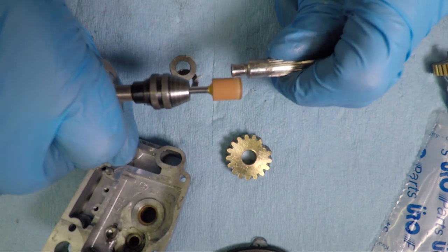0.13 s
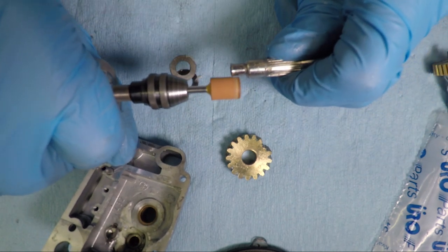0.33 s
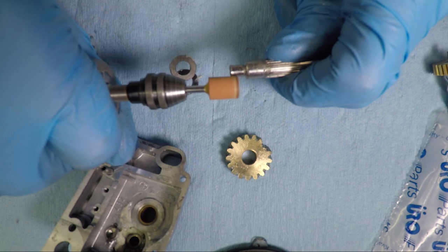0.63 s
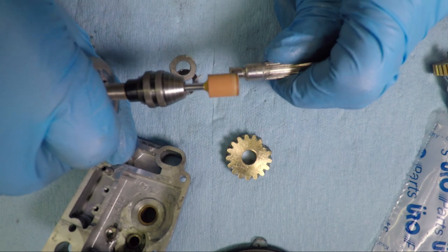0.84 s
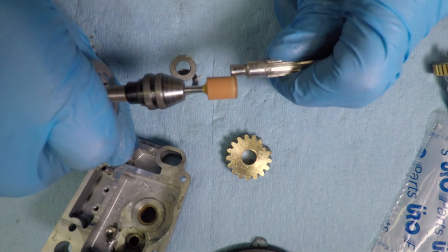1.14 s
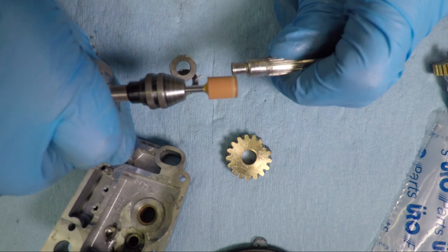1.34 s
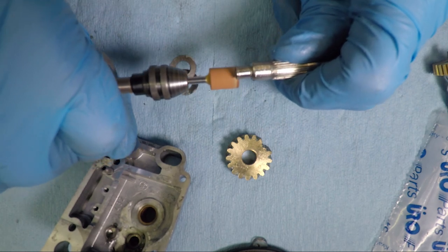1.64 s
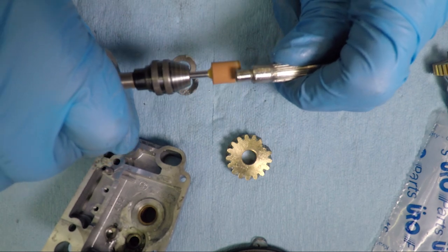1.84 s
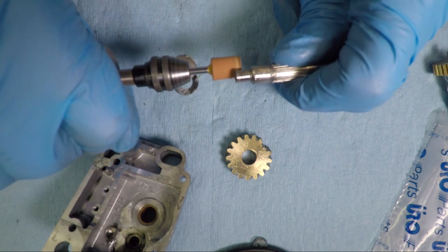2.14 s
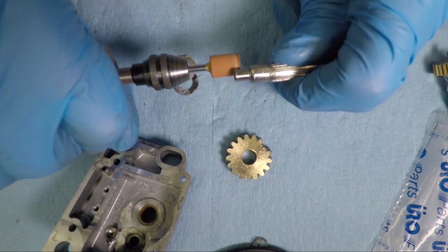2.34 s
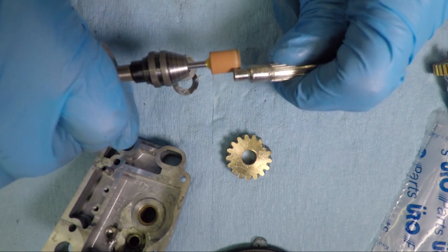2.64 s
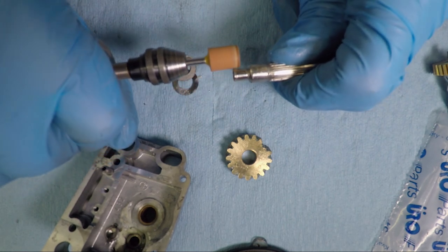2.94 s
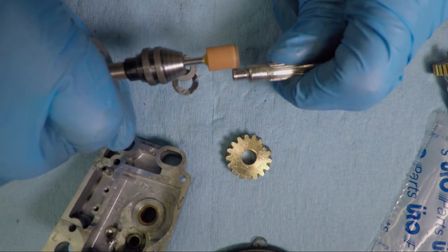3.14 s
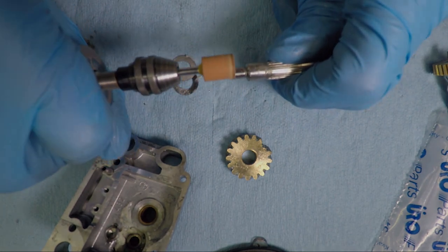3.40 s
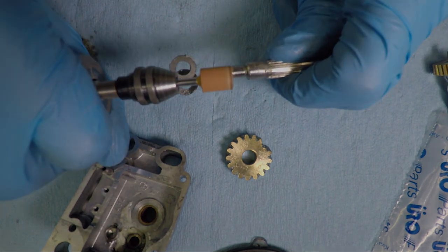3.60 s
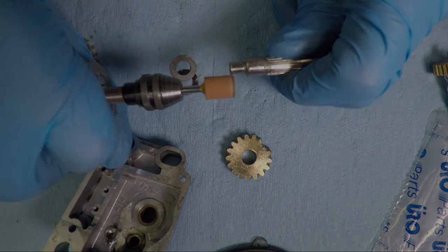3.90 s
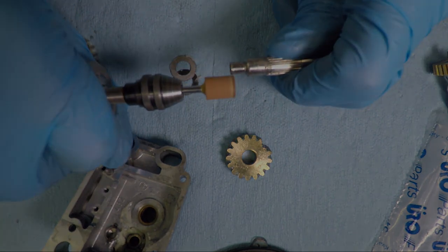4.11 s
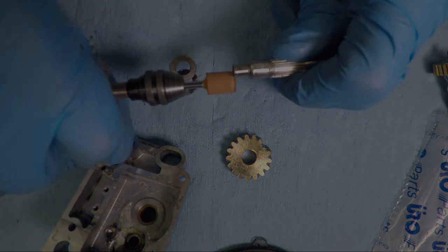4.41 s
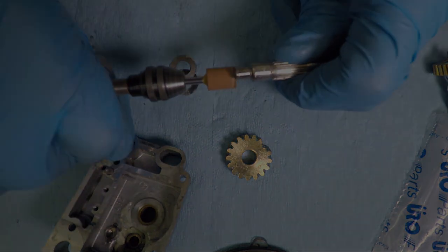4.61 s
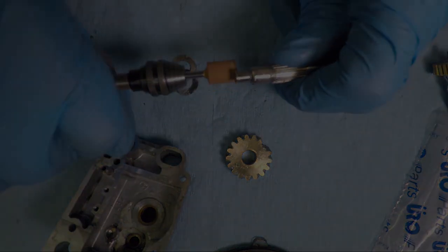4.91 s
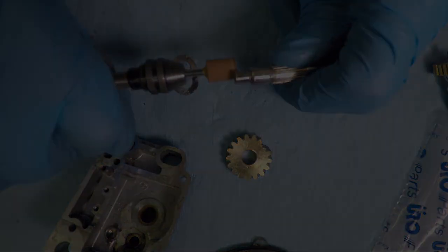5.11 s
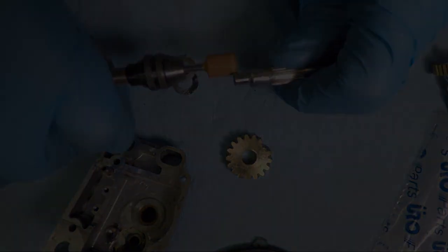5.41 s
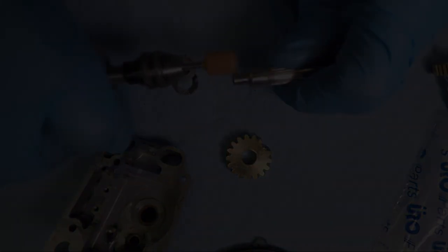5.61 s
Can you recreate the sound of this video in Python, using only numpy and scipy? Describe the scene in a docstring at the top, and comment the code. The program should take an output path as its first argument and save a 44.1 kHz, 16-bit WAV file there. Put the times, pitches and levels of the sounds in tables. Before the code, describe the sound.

A small rotary tool whines as its sanding drum grinds a steel shaft, with a buzzing, ringing rasp that gradually fades.

```python
"""In a workshop, a rotary tool spins a small sanding drum against a hand-held steel shaft.
The drum turns about 208 times a second. Its high spot knocks the steel once a turn, so the steel
rings and buzzes, while the grit rasps and crackles with the same beat. The motor whines and slows
a little under load, mains hum lies below, and the sound fades out at the end."""
import sys
import numpy as np
from scipy import signal
from scipy.fft import rfft, irfft, next_fast_len
from scipy.io import wavfile
from scipy.ndimage import uniform_filter1d

SR = 44100
rng = np.random.default_rng(int(sys.argv[2]) if len(sys.argv) > 2 else 0)


def digitize_waveform(pressure):
    """Quantize a signal to 16-bit integers and store it at the path in sys.argv[1].

    Rows of a 2-D input are taken as channels; values are limited to [-1, 1].
    """
    field = np.atleast_2d(pressure).T
    bounded = np.clip(field, -1, 1)
    quanta = np.round(bounded * 32767).astype(np.int16)
    wavfile.write(sys.argv[1], SR, quanta)


N = 253575
TIME = np.arange(N) / SR
FIRM_DB = -26.5  # grinding level of a firm stroke


def grinding(turns, press_db, bright_db, edge, buzz_db, bounce, wobble_hz=44.5, bounce_turns=3):
    """Ring, buzz, rasp and grit get louder as the hand presses; the drum may bounce and chatter."""
    # the hand-held shaft wobbles, so the knock comes early or late
    contact = turns + .0035 * drift(12) + .0018 * tone(wobble_hz * TIME + .3 * drift(8))
    bright_db = bright_db + 2.3 * (press_db - FIRM_DB)  # pressing harder brightens the ring
    middle_db = np.interp(edge, [0, 1], [-6, 2.5])
    ring = from_db(-5) * ringing_steel(contact, bright_db, middle_db)
    drag = from_db(-8.5) * rasp(contact)
    chips = from_db(np.interp(edge, [0, 1], [-9, -14])) * grit(turns, press_db)
    note = singing(turns, edge)
    chatter = 1 + bounce * np.cos(2 * np.pi * (turns / bounce_turns + .25 * drift(10)))
    steel = ring + from_db(buzz_db + 5.5) * buzz(contact) + drag + chips
    flutter = from_db(drift(25))
    return from_db(press_db) * (flutter * chatter * steel + note) + catches(contact) + snaps(press_db)


# The notes at which the shaft and the drum's stem ring. A narrow note rings longer.
# pitch_hz, width_hz, relative_db
STEEL_NOTES = [(1057, 144, -7.5), (1186, 89, -8), (1307, 214, -10), (1494, 350, -6), (1658, 200, -5.5),
               (1839, 180, -4.5), (2073, 490, -2.5), (2420, 540, -4), (2564, 250, -5), (2746, 60, 2.5),
               (3140, 530, -3), (3327, 440, -0.5), (3510, 310, -1), (3694, 370, -5), (4310, 370, -7.5),
               (5335, 240, -9)]

def ringing_steel(turns, bright_db, middle_db, middle_hz=2640, pivot_hz=3470):
    """Knocks and scraping ring the steel; the mix of notes shifts as the touching point moves."""
    hits = knocks(turns, scatter_turns=.0012, uneven_db=1.6)
    scrape = rms_one(once_a_turn(turns, sharpness=1.8) * rng.standard_normal(N))
    drive = hits + .18 * scrape
    ring = np.zeros(N)
    for k, (hz, width, db) in enumerate(STEEL_NOTES):
        tilt_db = .51 * bright_db * np.clip(np.log2(hz / pivot_hz), -.7, .65)
        bump_db = middle_db * np.exp(-(np.log2(hz / middle_hz) / .67) ** 2)
        gain = from_db(db + tilt_db + bump_db + 3.5 * swell(12))
        ring += (-1) ** k * gain * resonate(drive, hz, width)
    return ring / np.sqrt(uniform_filter1d(ring ** 2, size=2200) + 1e-12)  # keep the level even


# The tones of the buzz that the shaft lets through: cycles_per_turn, relative_db
BUZZ_TONES = [(15, 3), (16, 1), (17, -5), (18, -2), (19, -10), (20, 5), (21, 4), (22, 0), (23, -9), (24, 1),
              (25, 0), (26, 6), (27, 5)]
# The pitch the touching point favours as the tip slides along the drum: time_s, pitch_hz
CONTACT_PITCH = [(0.3, 4250), (0.75, 4480), (1.05, 4650), (1.35, 4380), (2.0, 4420), (2.8, 4370),
                 (3.1, 4500), (3.2, 4620), (3.3, 4880), (3.5, 4880), (4.0, 4350), (4.35, 4800),
                 (4.52, 4650), (5.35, 4330), (5.75, 4350)]

def buzz(turns, width_hz=1000, flicker_db=2.2):
    """The knocks make the touching point buzz; tones near its sliding pitch are boosted."""
    centre_hz, = in_time(CONTACT_PITCH)
    turns_per_s = np.gradient(turns) * SR
    wave, power = 0, 0
    for multiple, db in BUZZ_TONES:
        off_centre = (multiple * turns_per_s - centre_hz) / width_hz
        response = from_db(db + flicker_db * swell(12)) / (1 + 2j * off_centre) ** 2
        wave += response * np.exp(2j * np.pi * multiple * (turns + .78))
        power += abs(response) ** 2
    return wave.real * np.sqrt(2 / power)


# How strong the rasp is from low to high: pitch_hz, relative_db
RASP_COLOUR = [(200, -90), (400, -6.5), (700, -5.5), (1100, -4), (2000, 0), (3000, -2), (3700, -1.5),
               (4500, 4.5), (5200, -5.5), (5900, -18), (8000, -16), (16000, -40)]

def rasp(turns):
    """The rough drum drags over the steel all the way round, hardest near the high spot."""
    grip = 1 + once_a_turn(turns - .1, sharpness=.5)
    return rms_one(colour(grip * rng.standard_normal(N), RASP_COLOUR))


# How strong the crackle is from low to high: pitch_hz, relative_db
GRIT_COLOUR = [(1500, -23.5), (4000, 2.5), (6000, -2), (7600, 1), (8500, -5.5), (9700, 2), (11600, 1.5),
               (12600, -2.5), (14000, -2.5), (15500, -8.5)]

def grit(turns, press_db, grains_per_s=18000, full_bite_db=-17.5):
    """Grains tear off tiny chips; pressure bunches them into one burst a turn, ahead of the knock."""
    grains = (rng.random(N) < grains_per_s / SR) * rng.choice([-1, 1], N)
    sizes = from_db(-2 * np.minimum(rng.exponential(1, N), 5))
    firmness = from_db(.85 * np.minimum(press_db - full_bite_db, 0))
    ahead = turns + .4
    bite = .26 + firmness * once_a_turn(ahead, sharpness=2)
    chips = rms_one(grains * sizes) * bite / np.sqrt(uniform_filter1d(bite ** 2, size=850))
    # a few tall grains strike at the same places every turn and make the treble buzz
    ticks = sum(from_db(2.5 * drift(5)) * knocks(ahead + place, scatter_turns=.0006, uneven_db=2.2)
                for place in rng.normal(0, .09, size=8))
    return rms_one(colour(chips + 1.1 * firmness * rms_one(ticks), GRIT_COLOUR))


def singing(turns, edge, cycles_per_turn=13):
    """One high, wavering note, louder when the tip rides the drum's edge."""
    level_db = np.interp(edge, [0, 1], [-25, -5]) + .7 * swell(30) + .7 * swell(7)
    return from_db(level_db) * tone(cycles_per_turn * turns + .05 * drift(25))


# Moments when the drum catches on the steel; each has died away after 2.7 times its length.
# start_s, length_s, pitch_hz, width_hz, level_db
DRUM_CATCHES = [(0.095, 0.025, 2000, 394, -27), (0.177, 0.02, 2040, 300, -30.5),
                (0.278, 0.018, 1940, 754, -23.5), (0.71, 0.022, 2870, 1500, -36),
                (0.716, 0.026, 2720, 110, -27.5), (2.874, 0.021, 4450, 400, -29),
                (3.148, 0.078, 1190, 130, -37), (3.48, 0.016, 1900, 1900, -24),
                (4.443, 0.06, 1156, 69.4, -29.5), (4.292, 0.15, 5200, 700, -32.5),
                (4.34, 0.1, 2170, 700, -31), (4.452, 0.04, 4630, 200, -31), (4.68, 0.057, 2180, 200, -35),
                (4.79, 0.086, 2330, 700, -30), (5.455, 0.016, 4070, 1500, -26.5)]

def catches(turns):
    """A catch starts at once, hammers one note of the steel and lets go."""
    drive = knocks(turns, scatter_turns=.002, uneven_db=4) + 1.1 * rng.standard_normal(N)
    out = np.zeros(N)
    for start, length, hz, width, db in DRUM_CATCHES:
        corners_s = [start, start + .0019, start + .67 * length, start + 2.7 * length]
        envelope = np.interp(TIME, corners_s, [0, .8, .86, 0])
        ring = resonate(resonate(drive, hz, width), hz, width)
        ring_level = np.sqrt(np.average(ring ** 2, weights=envelope + 1e-9))
        out += from_db(db) * envelope * ring / ring_level
    return out


# Moments when a single grain snaps off the drum: start_s, peak_db
GRAIN_SNAPS = [(0.199, -32), (0.682, -19), (1.004, -9), (1.164, -12), (2.186, -20), (2.206, -17),
               (2.218, -24), (2.381, -17), (2.414, -17), (2.421, -17), (3.279, -8), (3.65, -17.5),
               (3.72, -26)]

def snaps(press_db, per_s=45, ring_hz=3600, width_hz=2600):
    """A snapping grain gives one sharp click; small ones come at random and grow with the pressure."""
    clicks = (rng.random(N) < per_s / SR) * from_db(press_db + 8 - 3 * rng.uniform(-1, 1, N))
    for start, db in GRAIN_SNAPS:
        clicks[round(start * SR)] += from_db(db)
    height = 1 - np.exp(-np.pi * width_hz / SR)  # ringing flattens a click; dividing restores its peak
    return resonate(clicks * rng.choice([-1, 1], N), ring_hz, width_hz) / height


# When the steel is held to the drum: touch_s, lift_s
TOUCH_TIMES = [(0.075, 0.135), (0.174, 0.212), (0.272, 1.522), (1.637, 3.512), (3.635, 3.72), (3.883, 4.92),
               (5.025, 5.8)]
# How hard the hand presses, given as the level of the grinding: time_s, level_db
HAND_PRESSURE = [(0.075, -27), (0.12, -28.5), (0.28, -23.5), (0.36, -25.5), (0.6, -24), (0.73, -21.5),
                 (0.78, -24.5), (0.87, -24), (0.92, -27), (0.99, -24), (1.2, -26), (1.27, -27), (1.37, -23),
                 (1.52, -27.5), (1.7, -33), (1.78, -29.5), (1.95, -29.5), (2.2, -26.5), (2.35, -32.5),
                 (2.43, -27), (2.75, -23.5), (2.94, -26), (3.13, -24), (3.29, -26), (3.39, -27.5),
                 (3.5, -24), (3.63, -38), (3.75, -37), (3.92, -29), (4.07, -27), (4.22, -28), (4.3, -25),
                 (4.49, -23), (4.57, -27.5), (4.72, -27.5), (4.87, -26), (5.05, -27.5), (5.17, -28.5),
                 (5.26, -31.5), (5.47, -25.5), (5.75, -24)]
# How the steel meets the drum. Edge is 0 on the drum's face and 1 on its edge.
# The last two columns set how much the tool shakes twice and three times a turn.
# time_s, bright_db, edge_0_to_1, buzz_db, bounce_0_to_1, shake_twice_db, shake_thrice_db
HAND_STYLE = [(0.12, -1, 0, -15.5, 0, -47.5, -52), (0.25, -11, 0.5, -15.5, 0.1, -48, -55),
              (0.34, -6, 0.57, -14, 0.2, -59, -46.5), (0.85, -14, 0.64, -12, 0, -64, -40),
              (0.92, 6, 0.7, -15, 0.1, -50, -57), (0.98, -6, 0.6, -14.5, 0.05, -51, -43),
              (1.32, 7, 0.1, -11.5, 0.23, -56, -44.5), (1.48, 2, 0.16, -11.5, 0, -50, -63),
              (1.62, 0, 0, -11.5, 0.7, -48, -57), (1.8, -13, 0.95, -17.5, 0.06, -53, -53),
              (2.08, 21, 0.92, -17.5, 0, -55, -46.5), (2.3, 11, 0.99, -16, 0.15, -69, -54),
              (2.52, 4, 0.85, -18, 0.16, -67, -47.5), (2.65, -0.5, 0.73, -10, 0, -56, -44),
              (3.15, -3, 0.27, -8.5, 0, -62, -45), (3.35, -4, 0, -12, 0.28, -47, -54),
              (3.5, -17, 0.1, -13.5, 0.3, -50.5, -60), (3.62, -7, 0.86, -17, 0.2, -47, -53),
              (3.82, 6, 1, -19, 0, -59, -43), (3.95, 4, 0.03, -19.5, 0.04, -49.5, -49.5),
              (4.48, -1, 0.02, -8.5, 0.23, -50, -50), (4.7, 8, 0.5, -21, 0.03, -53, -57),
              (4.88, 14, 0.9, -16, 0.44, -57, -51), (5.15, 9, 1, -15.5, 0.46, -64, -53),
              (5.35, 4, 0.15, -7.5, 0.2, -65, -43.5), (5.75, 5, 0.3, -15, 0.24, -64, -49.5)]

def hand(bite_s=.011, release_s=.018, graze_db=-41):
    """At each touch the drum bites, then lets go; between touches it still grazes the steel."""
    touch = np.zeros(N)
    for start, end in TOUCH_TIMES:
        bite = np.clip((TIME - start) / bite_s, 0, 1)
        release = np.exp(-np.clip((TIME - end) / release_s, 0, 20))
        touch += bite * release
    held_db, = in_time(HAND_PRESSURE)
    power = from_db(graze_db) ** 2 + (touch * from_db(held_db)) ** 2
    return 10 * np.log10(power), *in_time(HAND_STYLE)


# The drum slows under load and recovers when the steel lifts: time_s, turns_per_s
DRUM_SPEED = [(0, 210.3), (0.12, 208.7), (0.22, 210), (0.45, 208.5), (0.73, 207.3), (0.95, 208.2),
              (1.42, 207.1), (1.72, 209.1), (2.3, 208.5), (2.82, 208.3), (2.95, 207.1), (3.5, 206.8),
              (3.83, 210.3), (4.25, 208.8), (4.45, 206.7), (4.72, 209.1), (4.87, 208.5), (5.05, 209.4),
              (5.3, 208.7), (5.6, 206.7)]

def drum_turns():
    """Count the turns made so far; this sets the beat of the grinding and the motor."""
    turns_per_s, = in_time(DRUM_SPEED)
    return np.cumsum(turns_per_s) / SR


# The whine of the motor's sliding contacts, fan and bearings: cycles_per_turn, level_db, waver_db
WHINE_TONES = [(4.66, -55.5, 7), (5.046, -52.5, 2.5), (5.527, -46, 2.5), (7.5, -52, 8), (9, -56, 2.5),
               (10.24, -43, -2), (11.99, -49.5, -2.5), (18, -55, 2.5), (24, -51, 2.5), (35.9, -55.5, 2.5),
               (39, -65, 2.5)]
# How strong the air through the vents is from low to high: pitch_hz, relative_db
AIR_COLOUR = [(18, -38), (30, -11), (84, -13), (170, -16), (239, -15.5), (364, -13), (1160, -1), (1430, -7),
              (1540, -3.5), (2170, -2), (3400, -4.5), (4910, -7), (5310, -16), (10200, -13), (16000, -21.5)]

def motor(turns, press_db, shake_twice_db, shake_thrice_db, shake_once_db=-53.5):
    """The drum's bent stem shakes the tool, the spinning parts whine, and the fan blows air."""
    load_db = .8 * (press_db - FIRM_DB)
    shake, whine = 0, 0
    for multiple, db in enumerate((shake_once_db, shake_twice_db, shake_thrice_db), 1):
        shake += from_db(db + load_db + 2.2 * swell(23.5)) * tone(multiple * (turns + .015 * drift(20)))
    for multiple, db, waver_db in WHINE_TONES:
        whine += from_db(db + waver_db * swell(19)) * tone(multiple * turns + .11 * drift(16))
    air = from_db(-36) * rms_one(colour(rng.standard_normal(N), AIR_COLOUR))
    return shake + whine + air


# The low tones of the mains power: pitch_hz, level_db
HUM_TONES = [(60, -56), (120, -60.5), (180, -62.5), (240, -56), (300, -67.5)]

def mains_hum():
    """The workshop's electrics hum steadily."""
    return sum(from_db(db) * tone(hz * TIME) for hz, db in HUM_TONES)


def reflections(sound, decay_s):
    """Bench and walls throw back many tiny echoes, which drop by 60 dB in decay_s."""
    t = TIME[:SR // 3]
    tail = rng.standard_normal(len(t)) * from_db(-60 * t / decay_s) * (t > .002)
    return signal.fftconvolve(sound, tail / np.sqrt(np.sum(tail ** 2)))[:N]


# How strong the side sound is next to the centre sound: pitch_hz, side_db
STEREO_WIDTH = [(60, -24.5), (300, -22), (1000, -26), (4000, -26.5), (8000, -20), (14000, -19.5)]

def widen(centre):
    """A faint copy with wandering phase is added on the left and taken away on the right."""
    wander = np.exp(2j * np.pi * drift(4.7))
    copy = (signal.hilbert(centre, next_fast_len(N))[:N] * wander).real
    side = colour(copy, STEREO_WIDTH)
    return np.array([centre + side, centre - side])


def knocks(turns, scatter_turns, uneven_db):
    """One click a turn, each a little early or late and of its own strength."""
    count = np.arange(1, int(turns[-1]) - 1)
    timing, strength = rng.standard_normal((len(count), 2)).T
    at = np.interp(count + scatter_turns * timing, turns, np.arange(N))
    size = from_db(uneven_db * strength)
    sample, fraction = at.astype(int), at % 1  # each click is shared between two samples
    return rms_one(np.bincount(sample, size * (1 - fraction), N)
                   + np.bincount(sample + 1, size * fraction, N))


def once_a_turn(turns, sharpness):
    """A smooth bump of height 1 on every turn."""
    return np.exp(sharpness * (np.cos(2 * np.pi * turns) - 1))


def tone(cycles):
    """A pure tone with an average level (rms) of 1, starting anywhere in its cycle."""
    return np.sqrt(2) * np.sin(2 * np.pi * (cycles + rng.random()))


def resonate(sound, hz, width_hz):
    """Make a sound ring at one pitch, with a gain of 1 there."""
    r = np.exp(-np.pi * width_hz / SR)
    feedback = [1, -2 * r * np.cos(2 * np.pi * hz / SR), r * r]
    return signal.lfilter(np.array([1, 0, -1]) * (1 - r * r) / 2, feedback, sound)


def colour(sound, points):
    """Turn the lows and highs up or down along (pitch_hz, gain_db) points."""
    hz, db = np.transpose(points)
    bins_hz = np.maximum(np.fft.rfftfreq(2 * N, 1 / SR), 1)
    gain = from_db(np.interp(np.log(bins_hz), np.log(hz), db))
    return irfft(rfft(sound, 2 * N) * gain)[:N]


def drift(rate_hz):
    """A smooth random curve of typical size 1, changing about rate_hz times a second."""
    step = 40  # samples between random points
    r = np.exp(-2 * np.pi * step * rate_hz / SR)
    slow = signal.lfilter([1], [1, -2 * r, r * r], rng.standard_normal(N // step + 2002))[2000:]
    return np.interp(np.arange(N) / step, np.arange(len(slow)), rms_one(slow))


def swell(rate_hz):
    """A drift kept within +-1.5, so that nothing leaps out."""
    return 1.5 * np.tanh(drift(rate_hz) / 1.2)


def in_time(rows):
    """Join rows of (time_s, values...) into one curve for each value column."""
    time_s, *columns = np.transpose(rows)
    return [np.interp(TIME, time_s, column) for column in columns]


def rms_one(sound):
    """Scale to an average level (rms) of 1."""
    return sound / np.sqrt(np.mean(sound ** 2) + 1e-20)


def from_db(db):
    """Turn decibels into a number to multiply by."""
    return 10 ** (np.asarray(db) / 20)


def scene():
    """The tool is close and in the middle, with faint echoes and hum behind it."""
    press_db, bright_db, edge, buzz_db, bounce, shake_twice_db, shake_thrice_db = hand()
    turns = drum_turns()
    tool = grinding(turns, press_db, bright_db, edge, buzz_db, bounce)
    tool += motor(turns, press_db, shake_twice_db, shake_thrice_db)
    return widen(tool + from_db(-18) * reflections(tool, decay_s=.2) + mains_hum())


# The closing fade: time_s, gain_0_to_1
FADE_OUT = [(0, 1), (3.7, 1), (6.15, 0)]

def record(dry, cutoff_hz=15800):
    """Fade the sound out and cut the very highest treble."""
    fade, = in_time(FADE_OUT)
    low_pass = signal.ellip(12, .1, 90, cutoff_hz, fs=SR, output="sos")
    return signal.sosfilt(low_pass, dry * fade)


dry = scene()
out = record(dry)
digitize_waveform(out)
```